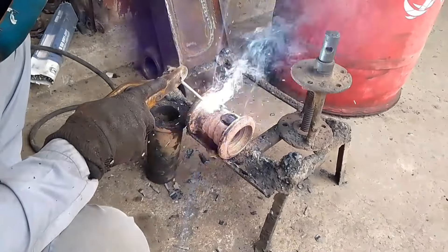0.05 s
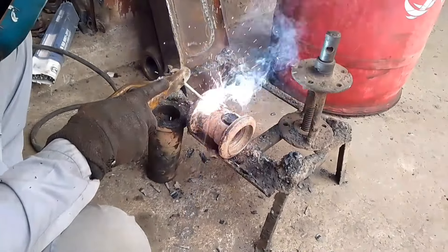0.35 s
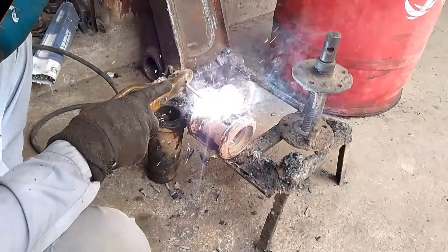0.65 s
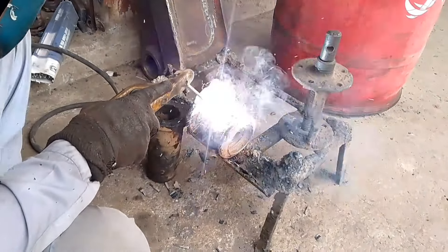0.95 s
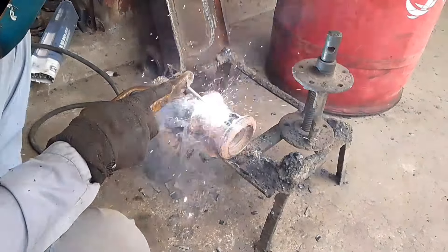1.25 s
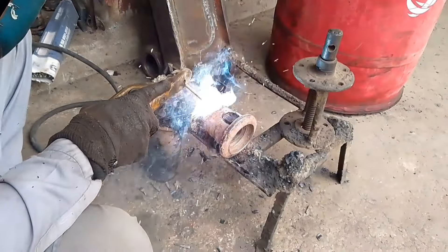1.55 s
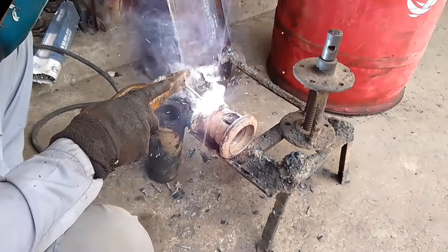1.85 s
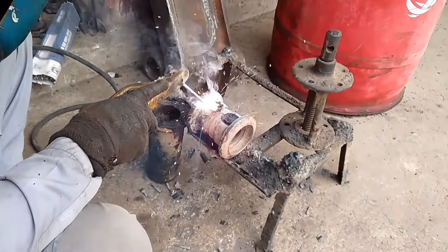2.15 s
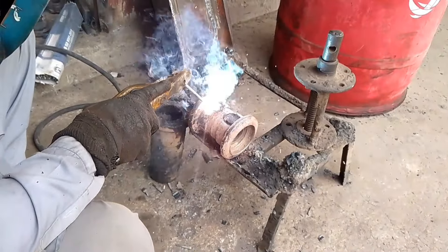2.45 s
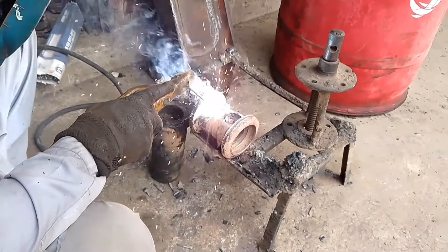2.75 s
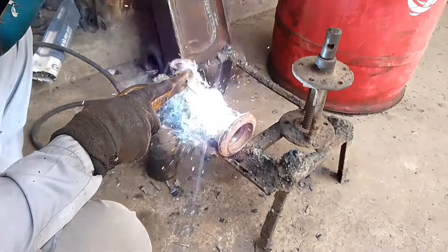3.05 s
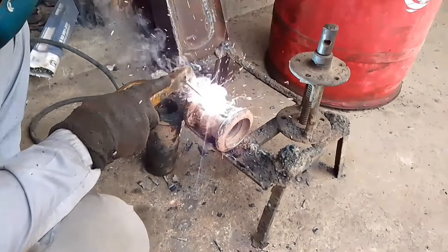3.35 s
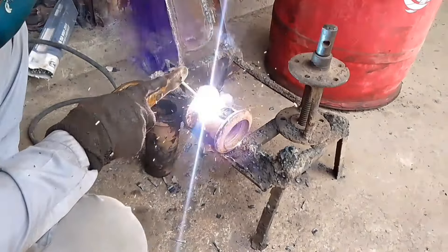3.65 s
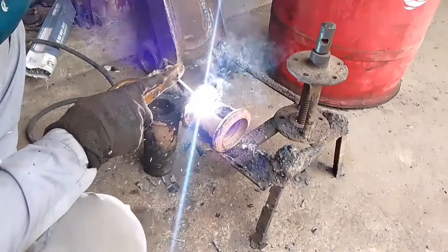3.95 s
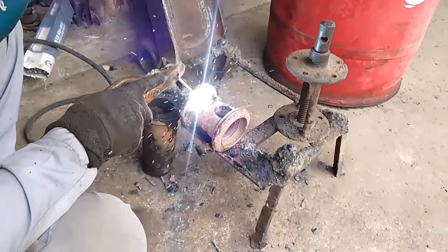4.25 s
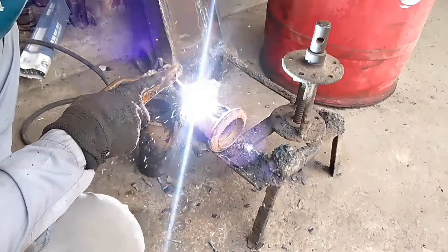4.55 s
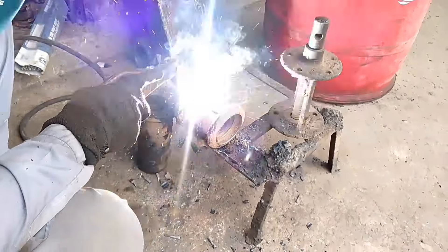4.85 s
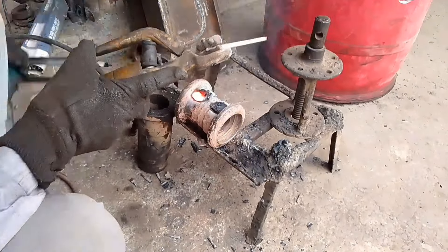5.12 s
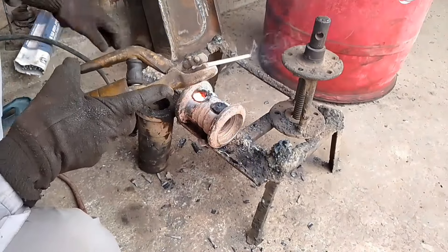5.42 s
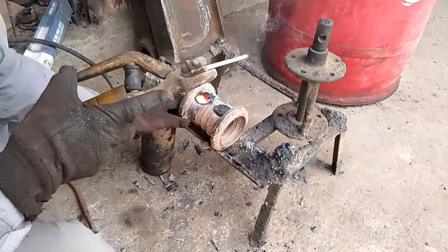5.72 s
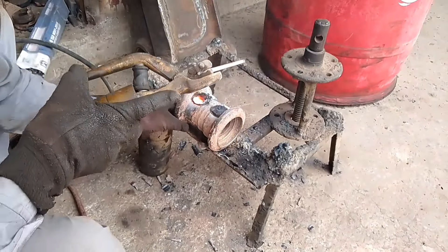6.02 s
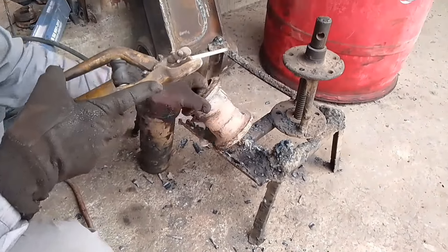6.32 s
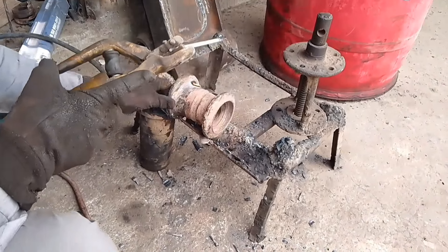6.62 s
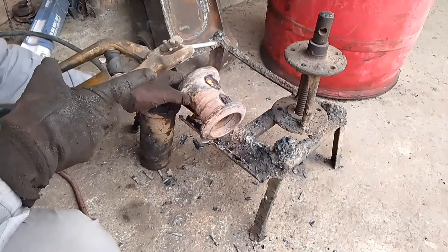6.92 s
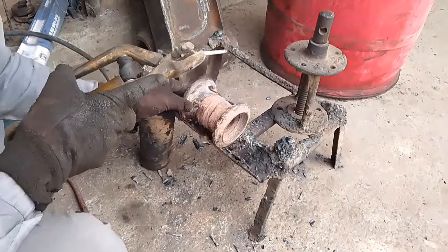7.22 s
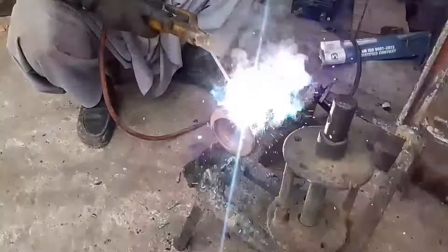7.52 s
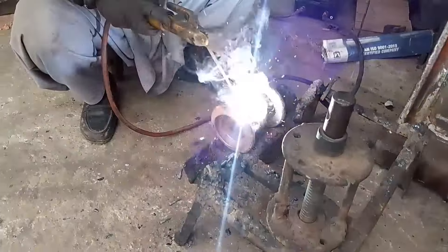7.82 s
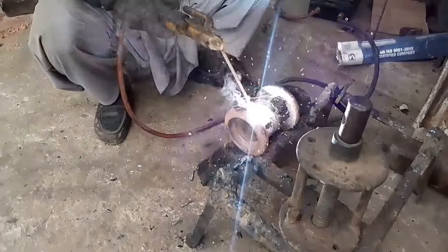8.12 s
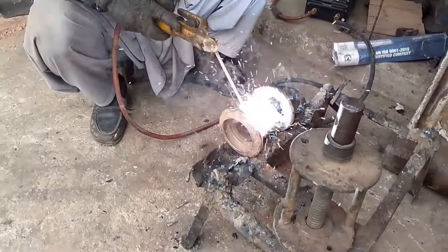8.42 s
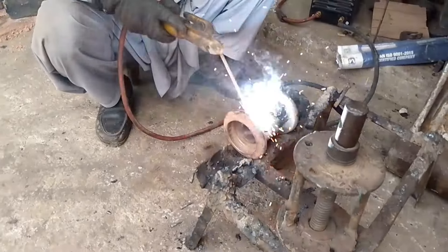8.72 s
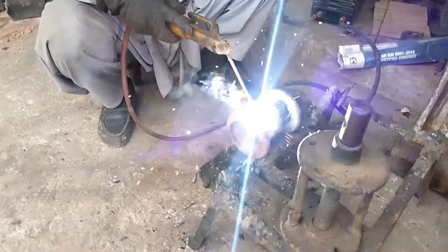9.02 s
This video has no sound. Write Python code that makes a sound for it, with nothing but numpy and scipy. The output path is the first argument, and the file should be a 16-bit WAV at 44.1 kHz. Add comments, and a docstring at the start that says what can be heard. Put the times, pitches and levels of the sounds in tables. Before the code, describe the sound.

Arc welding on a small steel fitting: dense frying crackle, a short silent break, then softer sizzling with three dull knocks.

```python
"""Stick-welding arc on a small steel pipe fitting in a yard: two runs, a silent pause between. Mono.
The arc is a dense crackle of discharges and gas pops that flutters as drops cross the gap.
Drops spit, gas whistles in the crater, and the hollow fitting hums and colours the arc as the rod moves.
The second run is quieter, with three dull knocks nearby. Low machine rumble lies under both."""
import sys
import numpy as np
from scipy import signal
from scipy.fft import rfft, irfft, next_fast_len
from scipy.io import wavfile
from scipy.ndimage import uniform_filter1d

SR = 44100
rng = np.random.default_rng(int(sys.argv[2]) if len(sys.argv) > 2 else 0)


def store_wav(level_fs):
    """Save 16-bit WAV to argv[1]."""
    pcm = np.round(np.clip(np.atleast_2d(level_fs), -1, 1) * 32767)
    wavfile.write(sys.argv[1], SR, pcm.T.astype(np.int16))


N = 399987
TIME = np.arange(N) / SR
FFT_SIZE = next_fast_len(N, True)
FREQS_HZ = np.maximum(np.fft.rfftfreq(FFT_SIZE, 1 / SR), 1)

# base arc strength, first run; takes hold at the rim: t/s, level/dB
ARC_LEVEL = [(0, -35), (1.41, -34.5), (1.49, -28.7), (3.2, -29), (3.7, -29.5), (4.25, -26.5), (5.6, -27.5),
             (7.14, -25.5)]
# flame flares with a low roar: peak t/s, length/s, roar gain/dB
FLARES = [(1.18, 0.061, 6.5), (2.78, 0.13, 3.5), (2.99, 0.096, 9), (4.05, 0.21, 1.5), (5.3, 0.25, 2.5),
          (7.0, 0.046, 5.5)]
# arc falters and dulls: deepest t/s, length/s, loss/dB
FALTERS = [(2.1, 0.077, 3), (2.43, 0.071, 5)]
# rod reaches each position, then leaves the last: t/s
MOVES_S = [-1, 1.4, 2.45, 3.7, 5.66, 7.3]
# pitch range of the gas pops: low f/Hz, high f/Hz
POP_BAND_HZ = (1900, 15000)


def undb(db):
    """dB to gain."""
    return 10 ** (np.asarray(db) / 20)


def unit(x):
    """Scale to rms 1."""
    return x / np.sqrt(np.mean(x ** 2))


def shape(x, response):
    """Filter by a frequency response."""
    return irfft(rfft(x, FFT_SIZE) * response, FFT_SIZE)[:N]


def colour(points):
    """Response through points: f/Hz, level/dB."""
    hz, db = np.transpose(points)
    return undb(np.interp(np.log(FREQS_HZ), np.log(hz), db))


def resonances(modes):
    """Power sum of modes: f/Hz, width/Hz, level/dB."""
    return np.sqrt(sum(undb(2 * db) / (1 + ((FREQS_HZ ** 2 - hz ** 2) / (FREQS_HZ * width_hz)) ** 2)
                       for hz, width_hz, db in modes))


def band(lo_hz, hi_hz):
    """Steep band-pass response."""
    return 1 / np.sqrt((1 + (lo_hz / FREQS_HZ) ** 20) * (1 + (FREQS_HZ / hi_hz) ** 20))


def walk(rate_hz):
    """Random drift, spread near 1, about rate_hz new values a second."""
    knots_s = np.cumsum(rng.gamma(2, .5 / rate_hz, int(2 * rate_hz * TIME[-1])))
    return np.interp(TIME, knots_s, rng.standard_normal(len(knots_s))) * np.sqrt(3 / 2)


def window(start_s, end_s, edge_s):
    """Gate with equal-power edges."""
    return np.sqrt(np.clip(np.minimum(TIME - start_s, end_s - TIME) / edge_s + .5, 0, 1))


def curve(points):
    """Straight lines through points: t/s, value."""
    return np.interp(TIME, *np.transpose(points))


def swells(rows):
    """Gaussian bumps: peak t/s, length/s, height/dB."""
    return sum(db * np.exp(-2 * ((TIME - t) / length_s) ** 2) for t, length_s, db in rows)


def crackle(rate_hz, spread_db):
    """Random impulses, mostly small, a few large."""
    fired = rng.random(N) < rate_hz / SR
    size = undb(spread_db * np.minimum(rng.exponential(size=N), 5))
    return unit(fired * size * rng.choice([-1, 1], N))


def echoes(x, decay_s, count=60):
    """Early echoes off floor, jig and drum; unit power gain."""
    lags_s = rng.uniform(.0005, .03, count)
    taps = np.zeros(SR // 25)
    taps[(lags_s * SR).astype(int)] = rng.standard_normal(count) * np.exp(-lags_s / decay_s)
    return signal.oaconvolve(x, taps / np.linalg.norm(taps))[:N]


def rumble():
    """Low machine rumble, slightly stronger in the second run."""
    # yard spectrum: f/Hz, level/dB
    spectrum = [(20, -2), (50, -8), (85, 0.5), (130, -7), (160, -7.5), (210, -13.5), (400, -25.5),
                (1000, -51.5)]
    level_db = curve([(0, -57.5), (7.2, -56), (7.5, -53.5)]) + 1.4 * walk(8.8)
    return unit(shape(rng.standard_normal(N), colour(spectrum))) * undb(level_db)


def knocks():
    """Each blow thuds into a hollow body, rattles it and dies away across the yard."""
    # blows: t/s, level/dB, rise/s, treble/dB
    blows = [(7.785, -31, 0.0019, -10), (8.263, -32.5, 0.013, -2.5), (8.745, -29.5, 0.02, 0)]
    # body modes: f/Hz, width/Hz, level/dB
    modes = [(480, 130, -6), (610, 48, 1), (877, 110, -17), (1360, 120, -11.5), (2030, 70, -13),
             (2920, 1100, -17)]
    body, out = resonances(modes) * band(290, 4700), 0
    for t, db, rise_s, treble_db in blows:
        age_s = np.maximum(TIME - t, 0)
        decay = np.exp(-age_s / 0.036) + 0.29 * np.exp(-age_s / 0.12)
        blow = crackle(5000, 1.4) * np.minimum(age_s / rise_s, 1) * decay
        blow[int((t + rise_s) * SR)] += undb(21)  # thud
        response = body * colour([(650, 0), (2500, treble_db)])
        out = out + undb(db) * shape(blow, unit(response))
    return out


def wavering_tone(clean=0.58, width_hz=70, trim_db=-0.5):
    """Faint tone under the sizzle, part clean, part breathy, with its octave."""
    # tone track: t/s, f/Hz, level before trim/dB
    track = [(2.23, 490, -43.5), (2.33, 630, -44.5), (2.46, 570, -47.5), (2.66, 560, -52), (2.75, 585, -46),
             (2.86, 540, -43), (2.93, 505, -42)]
    t, hz, db = np.transpose(track)
    phase = 2 * np.pi * np.cumsum(np.interp(TIME, t, hz)) / SR
    tone = (clean + walk(width_hz)) * np.sin(phase) + walk(width_hz) * np.cos(phase)
    octave = 0.52 * clean * np.sin(2 * phase)
    return unit(tone + octave) * undb(np.interp(TIME, t, db) + trim_db) * window(t[0], t[-1], .05)


def fitting_hum():
    """The arc puffs across the fitting's hole; the hollow sounds a breathy tone."""
    # puffs: peak t/s, length/s, f/Hz, level/dB
    puffs = [(4.36, 0.058, 1655, -38), (4.52, .06, 1170, -37.5), (4.873, 0.22, 1384, -41),
             (5.168, 0.055, 1386, -37), (5.818, 0.21, 1290, -40), (6.198, 0.35, 1278, -41),
             (6.617, 0.24, 1273, -39), (6.948, 0.38, 1262, -43.5)]
    out, breath = np.zeros(N), 0.28 + 1.02 * (walk(70) + 1j * walk(70))
    for t, length_s, hz, db in puffs:
        at = np.abs(TIME - t) < length_s
        offset_s = TIME[at] - t
        tone = np.real(breath[at] * np.exp(2j * np.pi * hz * offset_s))
        out[at] += undb(db) * np.exp(-2 * (offset_s / length_s) ** 2) * tone
    return out


def whistles():
    """Gas from the coating sings through the crater: tone plus octave, gliding and trembling."""
    # jets: t/s, length/s, start f/Hz, end f/Hz, fundamental/dB, octave/dB, rasp/fraction of pitch
    jets = [(1.909, 0.1, 2250, 2230, -38.5, -54, 0.006), (2.415, 0.04, 3660, 3470, -36, -55, 0.016),
            (3.793, 0.03, 2810, 2842, -24.5, -12, .003), (3.812, .024, 2860, 2820, -31, -21, .004),
            (3.84, .031, 2860, 2740, -35.5, -45, .01), (3.876, 0.011, 2780, 2860, -48, -21.5, 0.008),
            (8.349, 0.11, 1378, 1420, -43, -49, .02), (8.6, 0.046, 2835, 2880, -56, -34, 0.006),
            (8.609, 0.019, 2500, 2520, -59, -34, 0.05), (8.629, 0.036, 2890, 2870, -57, -27, 0.0046),
            (8.632, 0.026, 2590, 2640, -60, -36, 0.006)]
    out, tremble, flutter = np.zeros(N), walk(900), undb(0.8 * walk(400))
    for t, length_s, start_hz, end_hz, db, octave_db, rasp in jets:
        at = slice(int(t * SR), int((t + length_s) * SR))
        progress = np.linspace(0, 1, at.stop - at.start)
        hz = (start_hz + (end_hz - start_hz) * progress) * (1 + rasp * tremble[at])
        phase = 2 * np.pi * np.cumsum(hz) / SR
        tone = undb(db) * np.sin(phase) + undb(octave_db) * np.sin(2 * phase)
        envelope = np.sqrt(2 * np.abs(np.sin(np.pi * progress)))
        out[at] += flutter[at] * envelope * tone
    return out + 0.25 * echoes(out, 0.022)


def spatter(sizzle_db):
    """Molten drops blow apart: rough bursts, bright single sparks, fine ticks throughout."""
    # spatter bursts: t/s, length/s, level re sizzle/dB
    bursts = [(0.009, 0.034, 1), (0.913, 0.022, 4), (2.968, 0.044, -8), (5.8, 0.0077, 2),
              (6.027, 0.025, 8.5), (6.342, 0.016, 5), (6.377, 0.023, 7)]
    # bursting sparks: t/s, level/dB
    sparks = [(.25, -30.5), (7.728, -35.5), (7.767, -35), (7.838, -35), (8.009, -35), (8.133, -30.5),
              (8.59, -38.5), (8.608, -34.5), (8.683, -32), (8.7, -31.5), (8.928, -36.5), (8.953, -36.5)]
    spark_s, ref_db, doubling_db = 0.0074, -34, 3.5  # louder sparks last longer
    burst_gain = undb(sizzle_db) * sum(undb(db) * window(t, t + length_s, 0.0045)
                                       for t, length_s, db in bursts)
    spark_gain = sum(undb(db) * window(t, t + spark_s * 2 ** ((db - ref_db) / doubling_db), 0.0022)
                     for t, db in sparks)
    rough_colour = colour([(150, -25), (500, -4), (1800, -1), (4000, 4.5), (8000, 0), (15000, -22.5)])
    bright_colour = colour([(300, -24), (2500, -17), (8000, 1), (11000, -5), (15000, -19.5)])
    rough = unit(shape(crackle(9000, 4.0), rough_colour))
    bright = unit(shape(crackle(16000, 3.3), bright_colour))
    ticks = unit(shape(crackle(120, 1.5), bright_colour)) * undb(sizzle_db - 19.5)
    spits = burst_gain * rough + spark_gain * bright + ticks
    return .85 * spits + .5 * echoes(spits, 0.0055)


def gas_pops(rate_hz=2400, decay_s=0.0012, spread_db=1.3):
    """Gas pockets in the melt burst, each ringing briefly at its own pitch."""
    when, pitch, size, phase = rng.random((int(rate_hz * N / SR), 4)).T[:, :, None]
    age_s = np.arange(SR // 100) / SR
    hz = POP_BAND_HZ[0] + pitch * (POP_BAND_HZ[1] - POP_BAND_HZ[0])
    strength = undb(spread_db * np.minimum(-np.log(1 - size), 4))
    rings = strength * age_s * np.exp(-age_s / decay_s) * np.sin(2 * np.pi * (hz * age_s + phase))
    at = (when * N).astype(int) + np.arange(len(age_s))
    return unit(np.bincount(at.ravel(), rings.ravel(), N)[:N])


def discharge(rate_hz, spread_db, drops_db, flutter_db, echo_gain, paths=6, pop_share=0.32):
    """Tiny discharges and pops surge with each metal drop; echo paths shift as the arc wanders."""
    drops = walk(105)
    drops = drops - uniform_filter1d(drops, SR // 26)  # lull after each surge
    snaps = shape(crackle(rate_hz, spread_db), np.sqrt(1 - pop_share * band(*POP_BAND_HZ) ** 2))
    pops = gas_pops() * np.sqrt(pop_share * (POP_BAND_HZ[1] - POP_BAND_HZ[0]) / (SR / 2))
    source = (snaps + pops) * undb(drops_db * drops + flutter_db * walk(450))
    weights = np.array([walk(110) for _ in range(paths)])
    weights /= np.linalg.norm(weights, axis=0)
    sound = source + echo_gain * sum(weight * echoes(source, 0.003) for weight in weights)
    sound = sound + 0.28 * echoes(sound, 0.012)  # jig and drum stand still: steady colouring
    # the welder holds its current: short-term power stays even
    power = uniform_filter1d(shape(sound, band(2500, 12000)) ** 2, size=7000)
    return unit(sound / np.sqrt(power))


def arc_bands(source, response, levels_db):
    """Colour the crackle and set the levels of its sizzle, roar, fizz and top bands."""
    # range in which each level holds: low f/Hz, high f/Hz
    gauges_hz = ((2500, 9000), (300, 2000), (9000, 12000), (12000, 15000))
    splits_hz = (1900, 9000), (0, 1900), (9000, 12000), (12000, np.inf)
    spectrum, out = rfft(source, FFT_SIZE) * response, 0
    for (from_hz, to_hz), (lo_hz, hi_hz), db in zip(splits_hz, gauges_hz, levels_db):
        gauged = (FREQS_HZ > lo_hz) & (FREQS_HZ < hi_hz)
        strength = np.sqrt(np.sum(response[gauged] ** 2) / len(FREQS_HZ))
        passed = (FREQS_HZ >= from_hz) & (FREQS_HZ < to_hz)
        crossover = uniform_filter1d(passed * 1., size=6000)
        out = out + irfft(spectrum * crossover, FFT_SIZE)[:N] / strength * undb(db)
    return out


def arc_level_db(second_run_db=-43):
    """Sizzle level: lifted by surges and flares, cut by falters; even in the second run."""
    # surges as the rod is fed in: peak t/s, length/s, gain/dB
    surges = [(1.66, 0.048, 2), (3.23, 0.22, 1.2), (4.25, 0.052, 1.5), (4.52, 0.069, 2)]
    first_run_db = curve(ARC_LEVEL) + swells(surges) + 0.43 * swells(FLARES) - swells(FALTERS)
    return np.where(TIME < MOVES_S[-1], first_run_db, second_run_db)


def second_arc(sizzle_db):
    """Softer, sparser frying from an evenly burning arc."""
    # crackle spectrum: f/Hz, level/dB
    spectrum = [(80, -34), (210, -17.5), (370, -2), (600, 0.5), (1700, -7), (2700, -1), (3800, -6),
                (5000, -4.5), (6600, -6), (7900, -3), (10500, -12), (12200, -21), (15300, -25)]
    # fitting modes: f/Hz, width/Hz, level/dB
    modes = [(5070, 330, -2.5), (7870, 370, 0)]
    source = discharge(rate_hz=9000, spread_db=2.5, drops_db=2.0, flutter_db=1.2, echo_gain=1.0)
    response = np.hypot(colour(spectrum), resonances(modes))
    roar_db, fizz_db, top_db = sizzle_db - 2, sizzle_db - 8, sizzle_db - 16
    return arc_bands(source, response, (sizzle_db, roar_db, fizz_db, top_db)) * (TIME > MOVES_S[-1])


def first_arc(sizzle_db):
    """The rod moves from outside over rim and lip into the hole; each position rings differently."""
    # crackle spectrum: f/Hz, level/dB
    spectrum = [(80, -33), (210, -23), (350, -12.5), (540, -8), (1350, -7.5), (1850, -15), (2700, -10),
                (4800, -4), (8200, -5), (9500, -16.4), (11300, -19), (12100, -20.5), (15300, -22)]
    # treble: t/s, fizz re sizzle/dB, top re fizz/dB
    treble = [(0, -12.5, -9), (1.1, -17.5, -6), (1.38, -14, -1), (1.45, -12.5, -4), (1.9, -6.5, -6.5),
              (2.6, -9, -2.5), (3.25, -10.5, -4.5), (3.55, -10, -7), (4.1, -14, -4), (5.0, -16, -5),
              (5.6, -14.5, -3), (5.95, -15, -6.5), (6.5, -11, -3), (7.1, -14, -4.5)]
    # modes of the fitting and nearby gaps per rod position: f/Hz, width/Hz, level/dB
    outside = [(510, 260, -1), (710, 70, 1), (1013, 55, 1), (2650, 580, 1.5), (3200, 150, 5.5),
               (4950, 640, 10), (5930, 630, 5.5), (7782, 1000, 7)]
    rim = [(2248, 61, 1.5), (2540, 150, -1), (3120, 261, 2), (4160, 31, 1.5), (4380, 100, 5),
           (5080, 580, 2), (5880, 100, 8), (7140, 270, 7.5), (8050, 570, 6), (9170, 113, 5.5),
           (10397, 455, 2.5), (11350, 239, -3), (13100, 191, -3), (13246, 65, -7)]
    lip = [(1550, 160, -7.5), (2230, 55, -3), (2620, 70, -1.5), (3125, 150, 1), (4220, 130, -1.5),
           (4630, 65, 2), (6000, 190, -0.5), (7230, 910, 0), (7940, 90, 1.5), (8370, 430, -1.2),
           (10400, 309, -8.5), (11300, 240, -6.5)]
    hole = [(2608, 120, -6), (3200, 412, -5), (4750, 1060, -1.8), (6100, 300, 0.2), (6570, 90, -4.5),
            (7250, 390, -3), (9350, 230, -7), (10550, 344, -8.7), (11387, 304, -8), (12033, 72, -12),
            (13485, 391, -13.5)]
    deep = [(398, 240, -11), (2220, 97, -3), (2924, 480, 0.5), (3540, 244, -1), (4688, 880, 6),
            (5980, 350, 6.5), (7250, 280, 5), (7962, 564, -1.7), (8500, 35, 6), (10500, 1132, -2.5),
            (13490, 363, -6.5), (14108, 54, -5.5), (14581, 206, -12.5)]
    positions, roars_re_flame_db = (outside, rim, lip, hole, deep), (-11.5, -14, -14, -13, -13)
    source = discharge(rate_hz=12000, spread_db=2.0, drops_db=1.74, flutter_db=1.06, echo_gain=0.75)
    flame_db = curve(ARC_LEVEL) + swells(FLARES)
    t, fizz_offset_db, top_offset_db = np.transpose(treble)
    dulling_db = 1.3 * swells(FALTERS)
    fizz_db = sizzle_db + np.interp(TIME, t, fizz_offset_db) - dulling_db
    top_db = fizz_db + np.interp(TIME, t, top_offset_db) - dulling_db
    out = 0
    for start_s, end_s, modes, roar_db in zip(MOVES_S, MOVES_S[1:], positions, roars_re_flame_db):
        response = np.hypot(colour(spectrum), resonances(modes))
        levels_db = sizzle_db, flame_db + roar_db, fizz_db, top_db
        out = out + arc_bands(source, response, levels_db) * window(start_s, end_s, 0.048)
    return out


def scene():
    """Mono sum on two channels."""
    sizzle_db = arc_level_db()
    tones = fitting_hum() + wavering_tone()
    arc = first_arc(sizzle_db) + second_arc(sizzle_db)
    mono = arc + spatter(sizzle_db) + whistles() + tones + knocks() + rumble()
    return np.stack([mono, mono])


def record(dry):
    """Gain control ducks the peaks; soft clip, mute between the runs, low-pass."""
    # silent pause: start t/s, end t/s
    pause_s = (7.15, 7.486)
    follow_s, threshold_db, cutoff_hz = .006, -25.5, 15450
    pole = np.exp(-1 / (follow_s * SR))
    rms = np.sqrt(signal.lfilter([1 - pole], [1, -pole], dry[0] ** 2) + 1e-12)
    gain = np.minimum(undb(threshold_db) / rms, 1) ** .5  # 2:1
    clipped = np.tanh(1.876 * gain * dry) / 1.747
    gate = 1 - window(*pause_s, 0.021) ** 2
    lowpass = signal.ellip(12, .2, 80, cutoff_hz, fs=SR, output="sos")
    return signal.sosfilt(lowpass, clipped * gate)


dry = scene()
out = record(dry)
store_wav(out)
```